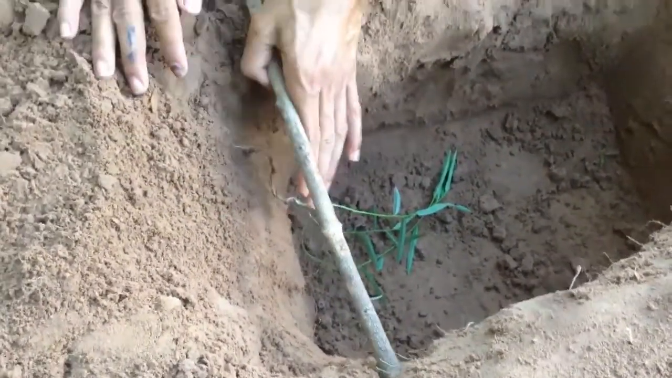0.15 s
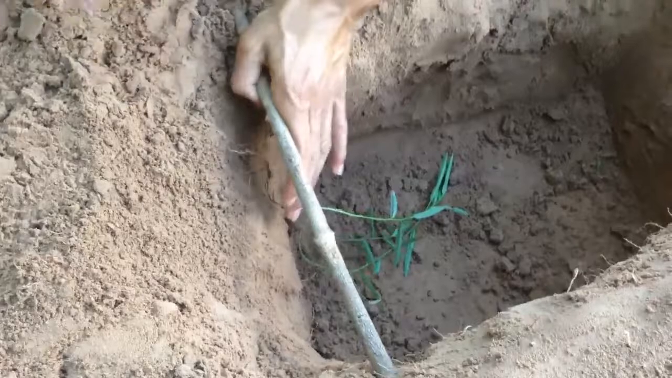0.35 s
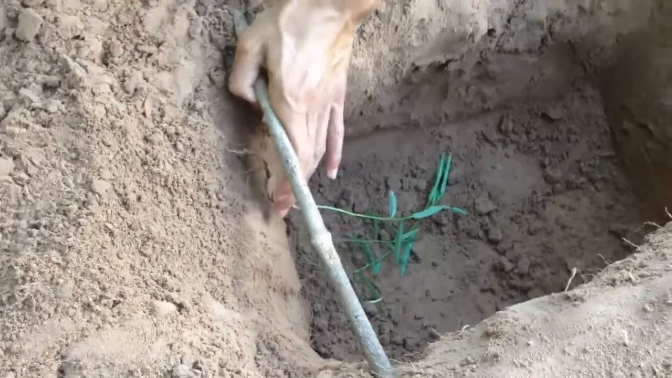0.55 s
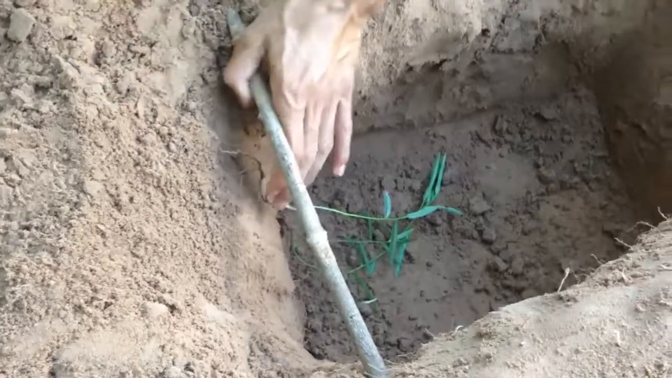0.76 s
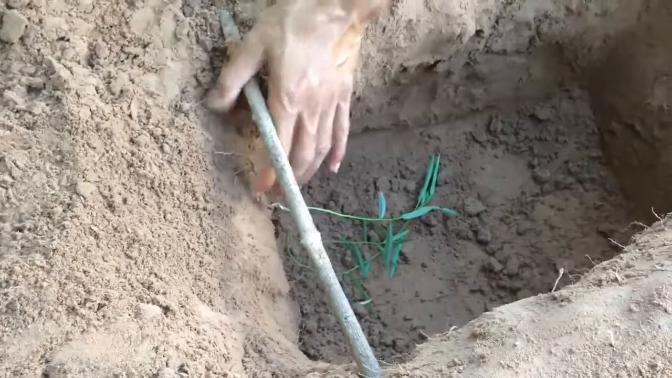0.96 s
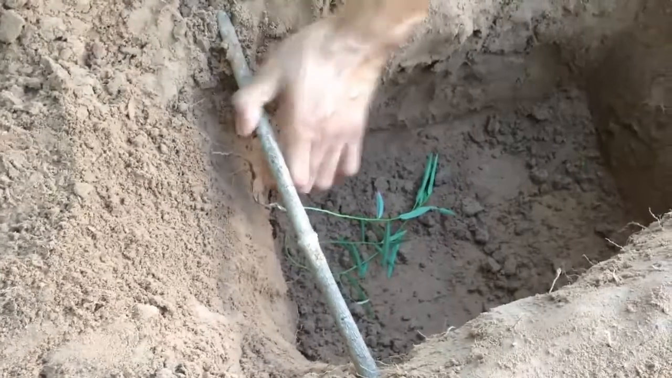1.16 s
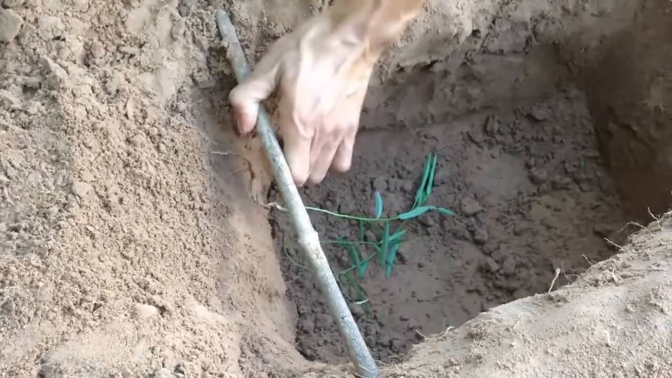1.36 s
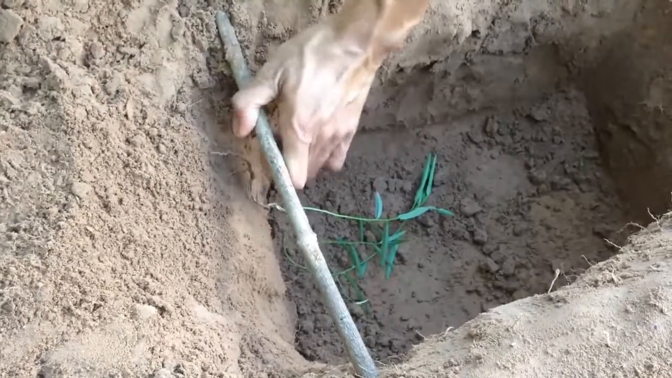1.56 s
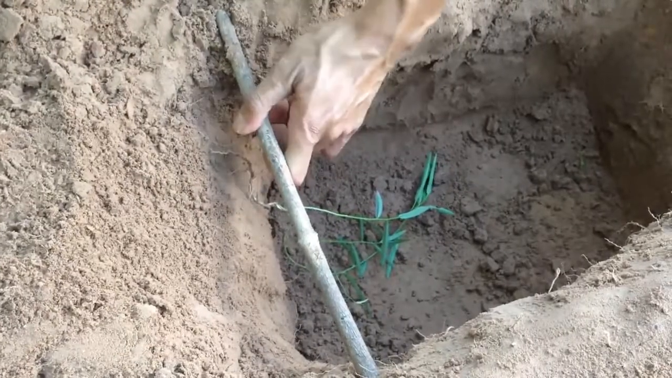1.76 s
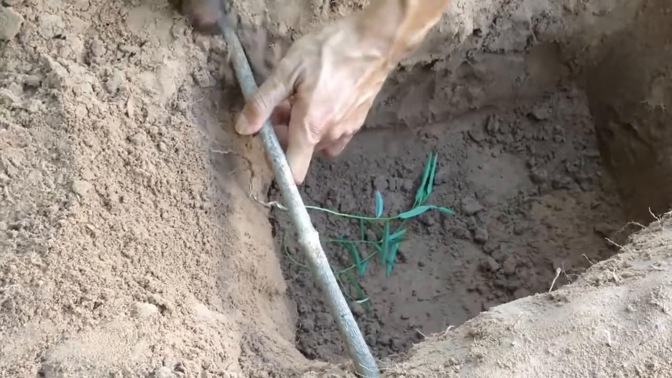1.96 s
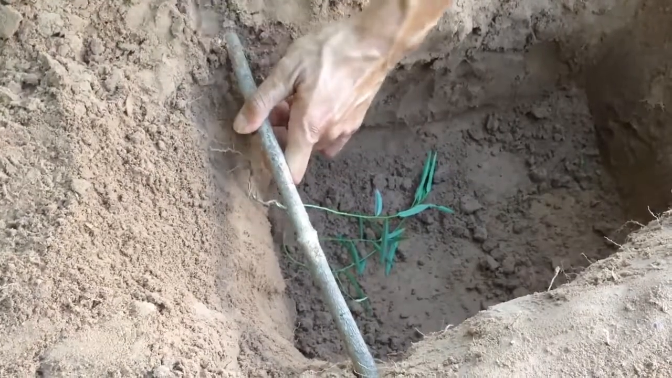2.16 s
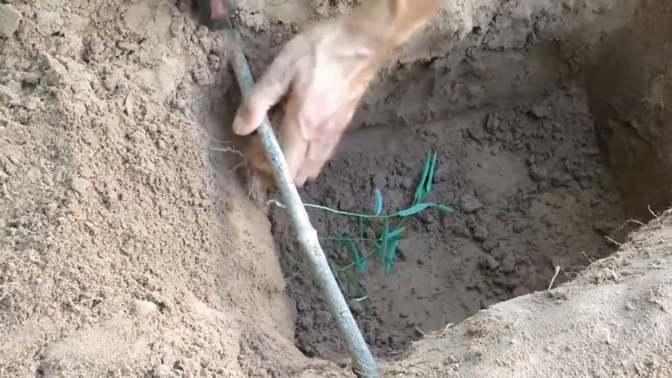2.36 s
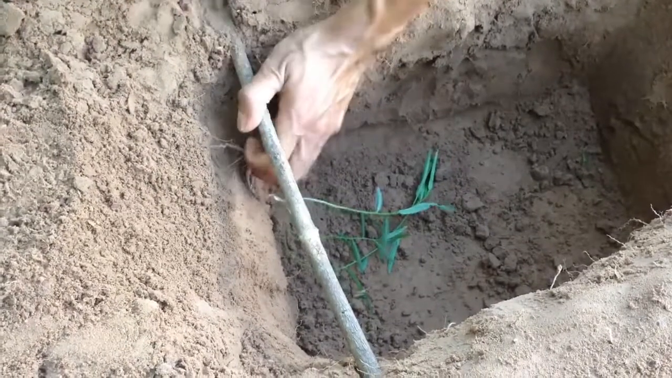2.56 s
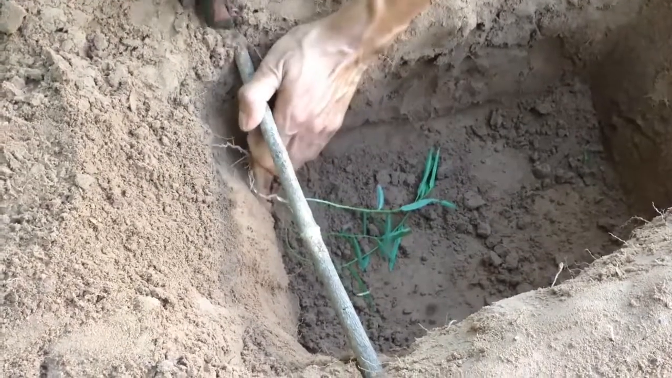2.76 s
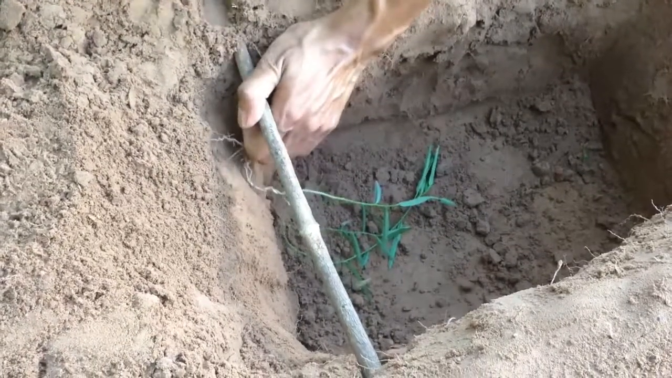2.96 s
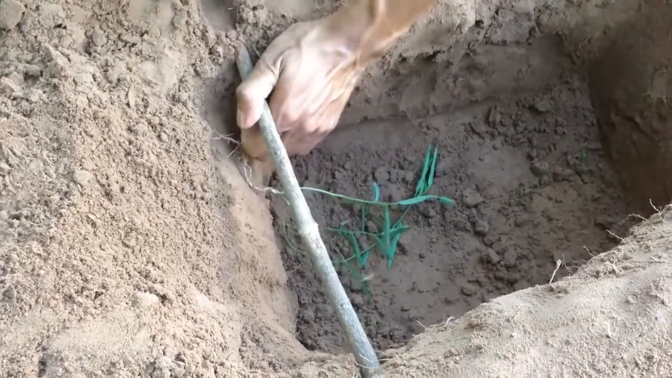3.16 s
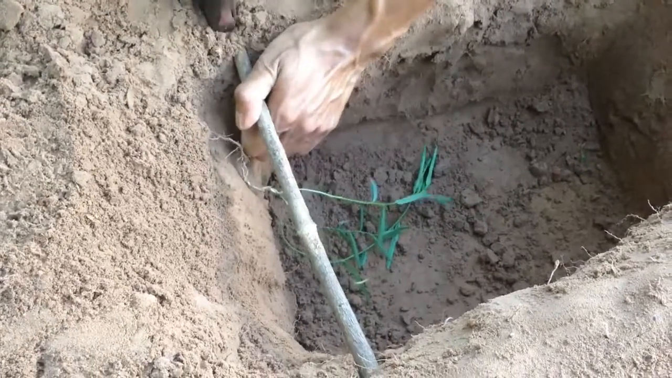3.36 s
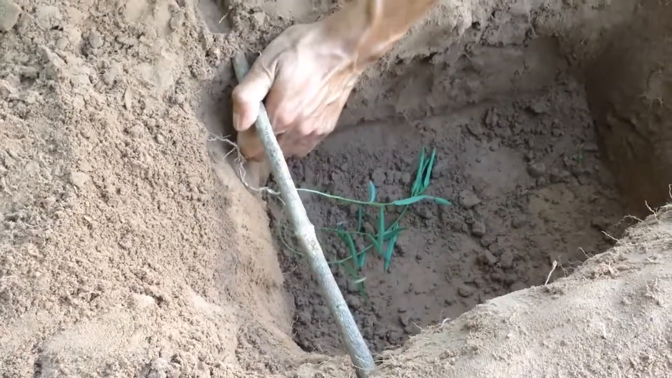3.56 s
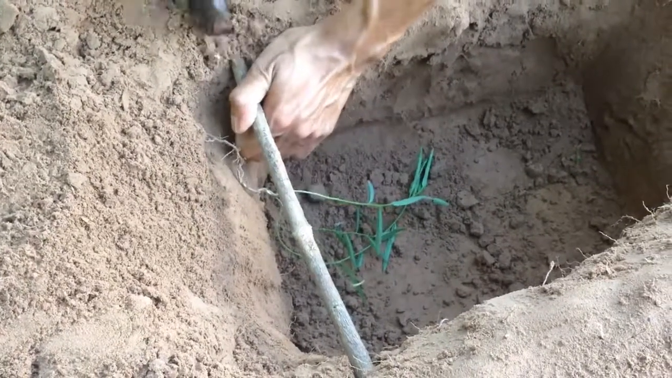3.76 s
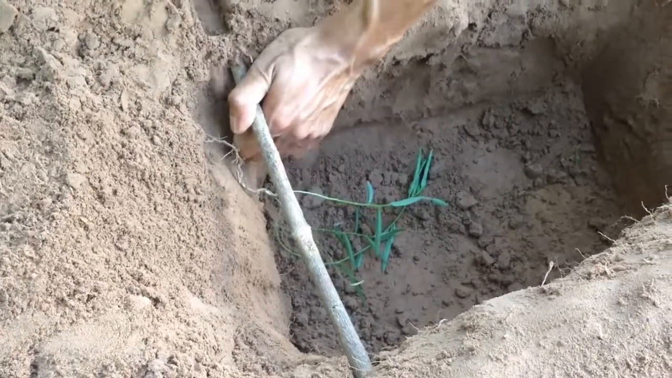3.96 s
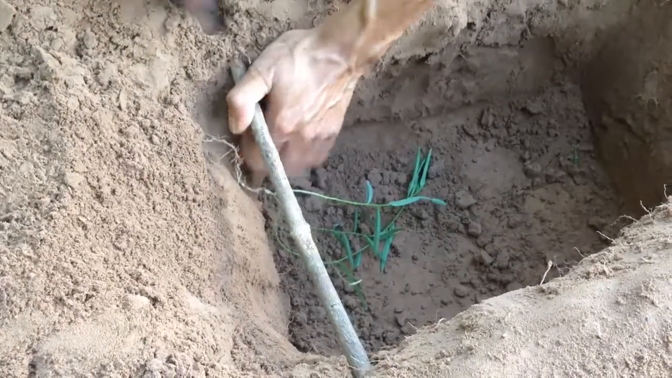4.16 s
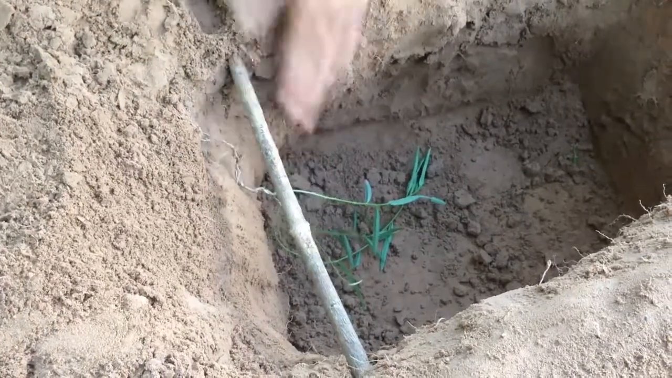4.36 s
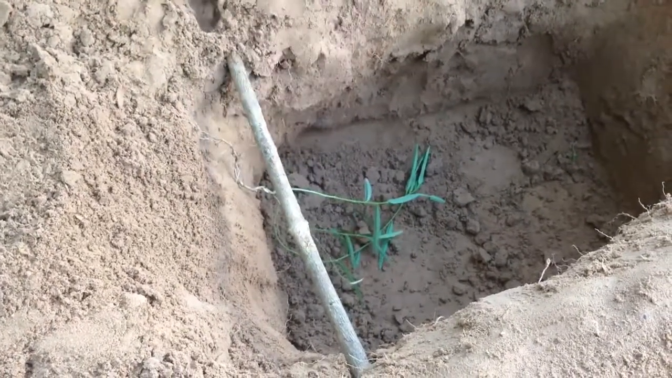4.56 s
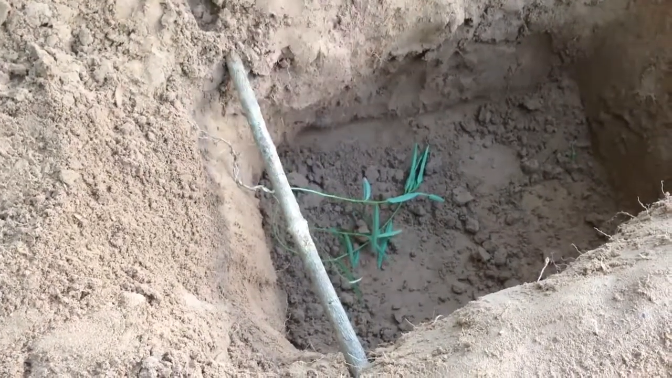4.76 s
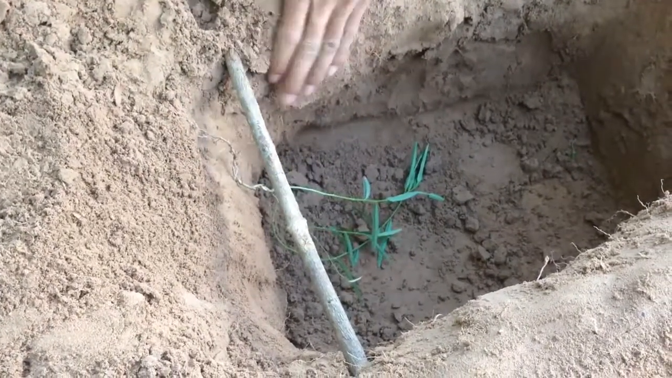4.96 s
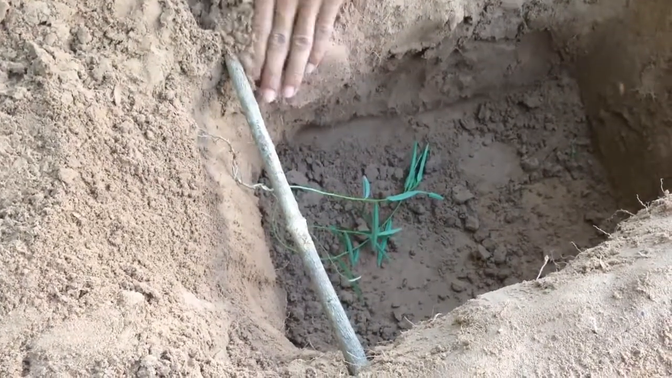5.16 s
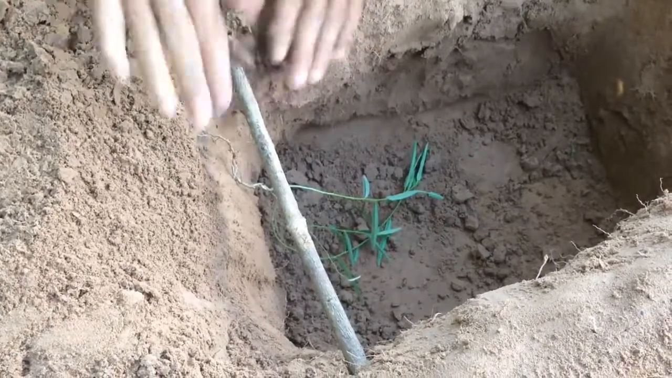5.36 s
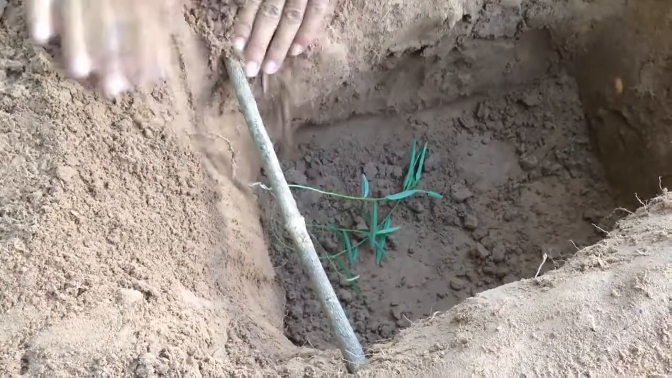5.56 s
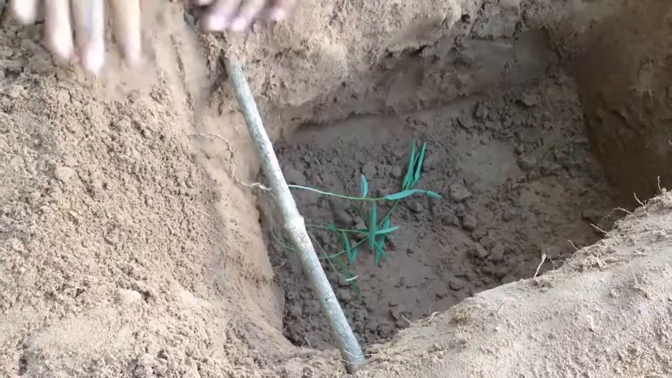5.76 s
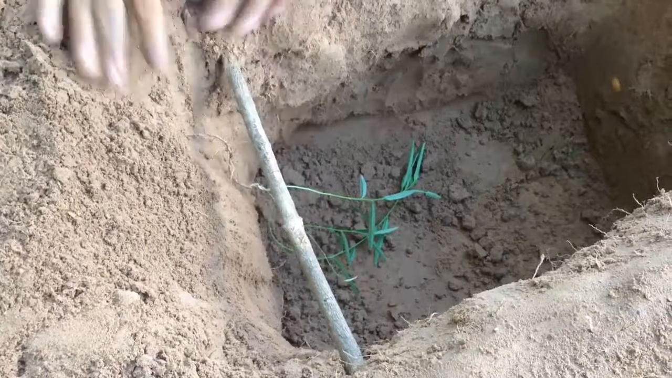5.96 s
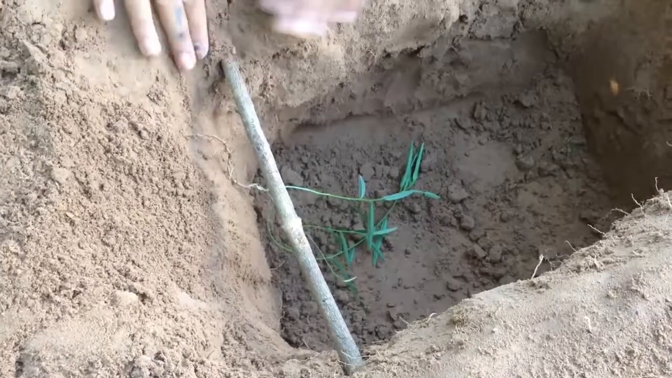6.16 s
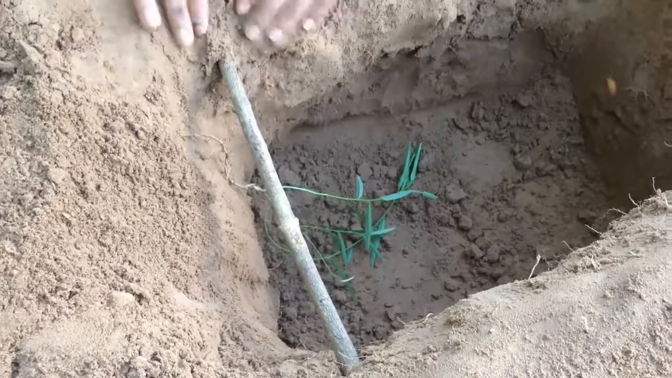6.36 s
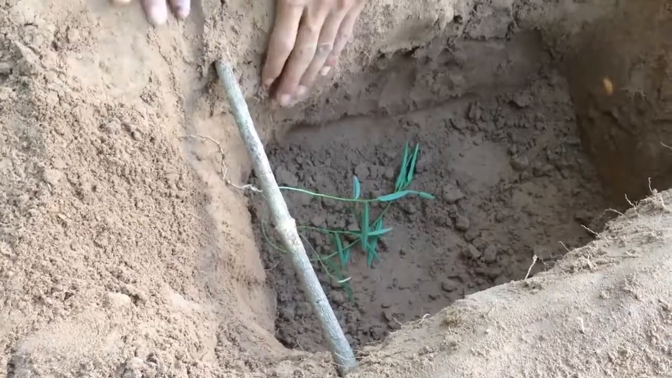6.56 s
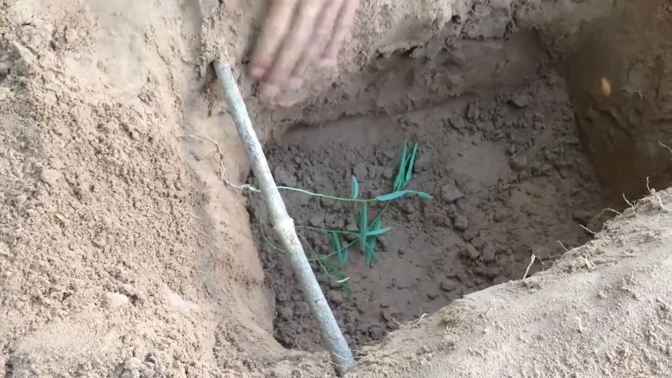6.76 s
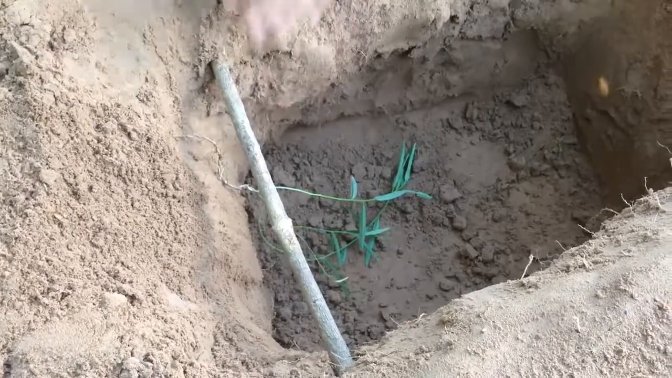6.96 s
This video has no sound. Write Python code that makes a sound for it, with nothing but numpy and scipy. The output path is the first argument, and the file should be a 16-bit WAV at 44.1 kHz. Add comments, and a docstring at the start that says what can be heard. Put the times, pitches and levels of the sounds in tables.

```python
"""Fingers rub and crumble dry soil over a faint steady hiss, as shaped noise with short bumps and squeaks.
Then a thin pipe is knocked into the hard soil at the rim of a dug pit: seven blows, each a dead thud
under a short clack, built from damped modes of earth and pipe with bursts of crushed grains.
Flat hands then pat the earth down around it: softer, looser earth modes and a faint knock of the buried pipe.
Outdoors and close, with almost no echo; a limiter holds the hardest blows."""
import sys
import numpy as np
from scipy import signal
from scipy.fft import rfft, irfft, next_fast_len
from scipy.io import wavfile
from scipy.ndimage import uniform_filter1d, minimum_filter1d

SR = 44100
rng = np.random.default_rng(int(sys.argv[2]) if len(sys.argv) > 2 else 0)


def to_wav(s):
    """Save 16-bit WAV."""
    ch = np.atleast_2d(s).T  # columns
    pcm = np.round(np.clip(ch, -1, 1) * 32767)  # PCM
    wavfile.write(sys.argv[1], SR, pcm.astype(np.int16))


N = 308700  # samples in the scene
T = np.arange(SR // 5) / SR  # time since a contact [s]

# Blows on the pipe: (time [s], thud level [dB], upper thud mode [Hz], knock level [dB], clack level [dB],
# clack tilt [dB/octave], tone with a node at the struck spot [Hz])
BLOWS = [(2.229, -15, 217, -24.5, -30.5, -19, 1210), (2.624, -5.5, 222.7, -21.5, -19.5, 5.5, 1294),
         (3.009, -2.5, 237, -13, -19.5, -0.5, 1550), (3.3075, -2.5, 242.7, -18.5, -27, -4, 951),
         (3.6035, -2, 247.5, -14.5, -24, 1, 3490), (3.963, -1.5, 240.3, -15, -18, -5.5, 1148),
         (4.3118, -1.5, 240, -18, -23, -1.5, 1290)]
# Pats of the hand: (time [s], thud level [dB], thud pitch [Hz], knock level [dB], knock tilt [dB/octave],
# clack level [dB], fingertip level [dB])
PATS = [(5.180, -32, 196, -57, 17, -70, -67.5), (5.688, -19.5, 196, -28, -18, -36, -39.5),
        (5.912, -33.5, 158, -55.5, -5, -56.5, -50.5), (6.153, -25, 153.4, -45, 4, -50, -43),
        (6.402, -19, 151, -35.5, 1, -34.5, -37), (6.625, -27.5, 223, -44.5, -4, -39, -42),
        (6.824, -26, 205, -36.5, 6, -58, -45)]
# Fingers bumping clods: (time [s], bump level [dB], crumble level [dB], bump pitch [Hz])
TOUCHES = [(0.149, -43.5, -56, 255), (0.368, -57, -62, 323), (0.438, -39.5, -48.5, 280),
           (0.519, -48, -52.5, 255), (0.549, -42.5, -50, 215), (0.566, -55, -47.5, 228),
           (1.386, -44, -76, 228), (1.989, -61, -82, 318), (3.247, -46, -69, 187), (5.793, -49, -74, 220),
           (6.066, -46.5, -76, 313)]
# Strokes of skin sliding on dry soil: (start time [s], length [s], level [dB])
RUBS = [(.51, .13, -60), (.79, 0.16, -62.5), (.93, 0.67, -64), (1.45, 0.1, -57), (1.64, 0.41, -67.5),
        (1.80, .05, -47), (4.54, .42, -65), (4.85, 0.12, -57.5), (5.19, 0.26, -58.5)]
# Fingers pressing soil against the pipe: (start time [s], length [s], level [dB])
PRESSES = [(.105, 0.13, -62.5), (.335, 0.057, -58), (.415, 0.081, -51.5), (.51, 0.089, -49),
           (.59, 0.153, -66), (.95, 0.085, -57), (1.21, .08, -55.5)]
# Skin squeaking on the pipe: (centre time [s], pitch [Hz], peak level [dB], length [s])
SQUEAKS = [(.865, 3990, -54, 0.04), (.888, 2429, -52, 0.029)]

# Modes of the ground, before each contact shifts them: (frequency [Hz], level [dB], t60 [s])
PACKED_EARTH = [(170, -4.3, .046), (242, 0, .036)]
LOOSE_EARTH = [(103.6, -3.5, 0.038), (183.8, 4, 0.042), (242, -9, 0.036), (334.5, -3, 0.024)]
# Hollow tone over the thud, before each contact shifts it: (frequency [Hz], level [dB], t60 [s])
HOLLOW = [(425, -2.5, 0.037), (480, 0.5, 0.047)]
# Lower and upper modes of the struck pipe: (frequency [Hz], level [dB], t60 [s])
PIPE_KNOCK = [(678, -3.5, .024), (847, 2, 0.03), (1154, 3, .018), (1372, -1, .018)]
PIPE_CLACK = [(2040, -2, 0.015), (2426, -3.5, 0.015), (3357, -2.5, .013), (3686, -3.5, .013),
              (4360, -5, 0.01), (5135, -11.5, .011)]
# Lower and upper modes of the pipe end packed in loose earth: (frequency [Hz], level [dB], t60 [s])
BURIED_KNOCK = [(781, -6.5, 0.021), (846, -1, 0.014), (1030, -6, 0.015), (1222, -16.5, 0.039)]
BURIED_CLACK = [(1680, -1, 0.0061), (2126, -7.5, 0.024), (2460, -1, 0.0078), (3340, -1.5, 0.013),
                (4270, -3, 0.0067)]

# Noise colours of loose grains, crushed soil and crumbling clods: (frequency [Hz], density [dB per Hz])
GRIT = [(3000, -18.5), (5500, 0.5), (7500, -4.5), (9500, -8), (11500, -4.5), (15000, -10)]
CRUNCH = [(150, -10), (350, 5.5), (700, -6), (1250, -2.5), (1700, -8), (2300, -7.5), (3500, -10),
          (5500, -25.5), (12000, -40)]
CRUMBLE = [(200, -26), (600, 2), (1100, -1.5), (1700, -16), (3500, -16), (8000, -27), (15000, -35)]
# Noise colours of a dull bump, a scuff through soil and rubbing skin: (frequency [Hz], density [dB per Hz])
BUMP = [(30, -28), (120, -6), (220, 4), (300, 2), (450, -13.5), (800, -24.5), (2000, -61)]
SCUFF = [(30, -2.5), (70, -2), (200, 2.5), (450, -0.5), (600, -5.5), (850, -7), (1100, -12.5), (1800, -21),
         (3500, -25.5), (9000, -36.5)]
RUB = [(200, -12.5), (800, -1), (1600, -5.5), (2600, 2), (4200, 4.5), (7000, -5), (11000, 1.5), (15000, -8)]
# Noise colours of microphone hiss and outdoor air: (frequency [Hz], density [dB per Hz])
HISS = [(880, -37), (1500, -12.5), (1770, -5.5), (2170, 0), (2520, -5), (3000, -0.5), (3340, -5.5),
        (4100, -4.5), (4440, -1.5), (4940, -5.5), (6010, -7.5), (7600, -6), (12300, -1), (14600, -10),
        (15500, -14)]
AIR = [(15, -40), (25, -8.5), (76, -1), (244, 1), (312, -1.5), (507, -3.5), (659, -6.5), (855, -6.5),
       (1600, -12.5), (2080, -44.5), (3520, -120)]
# Decay of the faint tail from pit walls and ground: (frequency [Hz], t60 [s])
SURROUNDS = [(100, .14), (300, .13), (1000, .12), (3000, .1), (12000, .06)]

PACKED_HZ, LOOSE_HZ = 242, 175  # thud pitch at which each earth's modes stand as listed
BUMP_HZ = 260  # bump pitch at which the bump colour stands as listed
RAMMED_DB_PER_OCTAVE = 21.5  # gain of the ringing as ramming raises the thud pitch
BLOW_HOLLOW_DB, PUSH_DB, SETTLE_DB = -20, -23, -39.5  # relative to the thud
GROUND_LAG_S = .001  # the ground gives way just after the contact
CRUNCH_DB = -12.5  # relative to the knock
FIRST_GRIT_DB, GRIT_LOSS_DB = -24.5, 3.5  # relative to the thud; each blow leaves fewer loose grains
NODE_DB, NODE_OCTAVES = -10, 0.22  # depth and width of the gap the struck spot leaves among the pipe tones
PAT_HOLLOW_DB, HOLLOW_FOLLOWS = 2, 0.76  # hollow tone follows the clack by this share, the thud by the rest
PAT_GRIT_DB = -15  # relative to the clack
STROKE_ATTACK_S, STROKE_RELEASE_S = 0.037, 0.039
ECHO_DB = -29.5  # relative to the contacts
HISS_DB, AIR_DB = -60, -66  # rms
CEILING_DB, RECOVERY_DB_PER_S, LOOK_AHEAD_S = -0.37, 7.5, .006  # limiter
TOP_HZ = 15500  # band limit


def blows():
    """Each blow bites through loose grains, clacks on the soil-damped pipe and sets the packed ground thudding."""
    out = np.zeros(N)
    for earlier, (s, thud_db, thud_hz, knock_db, clack_db, clack_tilt_db, node_hz) in enumerate(BLOWS):
        # the upper mode and the hollow tone rise and grow as the soil is rammed
        stiffening = thud_hz / PACKED_HZ
        rammed_db = RAMMED_DB_PER_OCTAVE * np.log2(stiffening)
        # only the upper mode shifts; it lies half an octave up, so the tilt is doubled
        mode_shifts = np.array([[1], [stiffening]])
        thud = amp(thud_db) * ring(PACKED_EARTH, attack=.006, stretch=mode_shifts, tilt_db=2 * rammed_db)
        hollow_db = thud_db + BLOW_HOLLOW_DB + rammed_db
        hollow = amp(hollow_db) * ring(HOLLOW, attack=0.0011, stretch=stiffening)

        knock = amp(knock_db) * ring(struck_at(PIPE_KNOCK, node_hz), attack=0.00027)
        clack_modes = struck_at(PIPE_CLACK, node_hz)
        clack = amp(clack_db) * ring(clack_modes, attack=0.00035, tilt_db=clack_tilt_db)
        pipe = grind(knock + clack, share=0.15, t60=0.011)

        grit_db = thud_db + FIRST_GRIT_DB - GRIT_LOSS_DB * earlier
        grit = amp(grit_db) * puff(GRIT, t60=0.01, attack=0.00026)
        crunch = amp(knock_db + CRUNCH_DB) * puff(CRUNCH, t60=.045, attack=0.0094)
        push = amp(thud_db + PUSH_DB) * puff(SCUFF, t60=.04, attack=.004)  # soil shoved aside
        # the ground trembles a moment longer
        settle = amp(thud_db + SETTLE_DB) * puff(BUMP, t60=.3, attack=.01)

        add(out, s - .004, crunch + push)
        add(out, s, hollow)
        add(out, s + GROUND_LAG_S, thud + settle)
        add(out, s + 0.00047, pipe + grit)
    return out


def pats():
    """The fingers land just before the palm; looser earth gives a deeper thud that jogs the buried pipe end."""
    out = np.zeros(N)
    for s, thud_db, thud_hz, knock_db, knock_tilt_db, clack_db, fingertips_db in PATS:
        thud = amp(thud_db) * ring(LOOSE_EARTH, attack=0.0051, stretch=thud_hz / LOOSE_HZ)
        hollow_db = thud_db + HOLLOW_FOLLOWS * (clack_db - thud_db) + PAT_HOLLOW_DB
        hollow = amp(hollow_db) * ring(HOLLOW, attack=0.001, stretch=0.953)
        knock = amp(knock_db) * ring(BURIED_KNOCK, attack=0.00011, tilt_db=knock_tilt_db)
        clack = amp(clack_db) * ring(BURIED_CLACK, attack=0.00033, tilt_db=1.0)
        pipe = grind(knock + clack, share=0.57, t60=0.0093)
        grit = amp(clack_db + PAT_GRIT_DB) * puff(GRIT, t60=0.019, attack=0.00086)
        fingertips = amp(fingertips_db) * puff(SCUFF, t60=0.063, attack=0.0034)
        add(out, s - .007, fingertips)
        add(out, s, thud + hollow + pipe + grit)
    return out


def fingers():
    """Fingers press and rub the soil, bump and crumble small clods, and squeak on the pipe."""
    return sliding(RUBS, RUB, grain_db=2.2) + sliding(PRESSES, SCUFF, grain_db=2.6) + touches() + squeaks()


def sliding(strokes, spectrum, grain_db):
    """Each stroke swells, holds and lets go; dry grains of uneven size catch under the skin."""
    t = np.arange(N) / SR
    pressure = np.zeros(N)
    for s, length, db in strokes:
        swell = (t - s) / STROKE_ATTACK_S
        release = (s + length - t) / STROKE_RELEASE_S
        shape = np.clip(np.minimum(swell, release), 0, 1)
        pressure = np.maximum(pressure, amp(db) * shape)
    grains = rng.standard_normal(N) * amp(grain_db * rng.exponential(size=N))
    return pressure * unit(colour(grains, spectrum))


def touches():
    """A finger bumps a clod with a dull puff while its grains crumble; smaller clods sound higher."""
    out = np.zeros(N)
    for s, bump_db, crumble_db, bump_hz in TOUCHES:
        clod = [(hz * bump_hz / BUMP_HZ, db) for hz, db in BUMP]
        bump = amp(bump_db) * puff(clod, t60=0.023, attack=.002)
        crumble = amp(crumble_db) * puff(CRUMBLE, t60=0.031, attack=0.00061)
        add(out, s, bump + crumble)
    return out


def squeaks():
    """Skin squeaks on the pipe: a short swelling tone, roughened by pitch jitter on every sample."""
    out = np.zeros(N)
    for s, hz, db, length in SQUEAKS:
        jittered_hz = hz * (1 + 0.3 * rng.standard_normal(len(T)))
        phase = 2 * np.pi * np.cumsum(jittered_hz) / SR
        swell = np.sin(np.pi * np.minimum(T / length, 1))
        add(out, s - length / 2, amp(db) * swell * np.sin(phase))
    return out


def ring(modes, attack, stretch=1, tilt_db=0):
    """Damped modes of alternating sign; each contact spot tilts their strengths and varies them by about 1 dB."""
    hz, db, t60 = np.transpose(modes)[:, :, None]
    db = db + tilt_db * np.log2(hz / hz[0]) + rng.standard_normal(hz.shape)
    sign = (-1) ** np.arange(len(modes))[:, None]
    waves = sign * amp(db - 60 * T / t60) * np.sin(2 * np.pi * hz * stretch * T)
    return burst(waves.sum(0) * (1 - np.exp(-T / attack)))


def struck_at(modes, node_hz):
    """Tones near node_hz hardly move at the struck spot and stay weak."""
    struck = []
    for hz, db, t60 in modes:
        octaves_away = np.log2(hz / node_hz)
        gap_db = NODE_DB * np.exp(-(octaves_away / NODE_OCTAVES) ** 2)
        struck.append((hz, db + gap_db, t60))
    return struck


def grind(x, share, t60):
    """Grains break one after another under a contact, and each rings the body again."""
    force = rng.standard_normal(len(T)) * amp(-60 * T / t60) * T
    force *= share / np.linalg.norm(force)
    force[0] = 1  # the first hit
    return signal.fftconvolve(x, force / np.linalg.norm(force))[:len(T)]


def puff(spectrum, t60, attack):
    """A short burst of crushed soil grains: decaying noise with a soft onset, then coloured."""
    envelope = amp(-60 * T / t60) * (1 - np.exp(-T / attack))
    return burst(colour(rng.standard_normal(len(T)) * envelope, spectrum))


def surrounds(x):
    """The pit walls and the ground scatter a short faint tail, new for every half second."""
    out = np.zeros(N)
    for start in range(0, N, SR // 2):
        # noise that dies away at its own rate in each frequency band
        hz, t, z = signal.stft(rng.standard_normal(SR // 3), SR, nperseg=256)
        decay = amp(-60 * t / along(SURROUNDS, hz)[:, None])
        tail = signal.istft(z * decay, SR, nperseg=256)[1]
        add(out, start / SR, signal.fftconvolve(x[start:start + SR // 2], tail / np.linalg.norm(tail)))
    return out


def background():
    """Faint steady microphone hiss and low outdoor air, both coloured noise."""
    hiss = amp(HISS_DB) * unit(colour(rng.standard_normal(N), HISS))
    air = amp(AIR_DB) * unit(colour(rng.standard_normal(N), AIR))
    return hiss + air


def limiter(x):
    """The gain drops just before a peak passes the ceiling and creeps back, so the hiss dips after hard blows."""
    ahead = round(LOOK_AHEAD_S * SR)
    needed_db = np.minimum(0, CEILING_DB - 20 * np.log10(np.abs(x) + 1e-9))
    early_db = minimum_filter1d(needed_db, 2 * ahead)
    # a running minimum against a steady climb gives the slow recovery
    climb_db = RECOVERY_DB_PER_S * np.arange(N) / SR
    gain_db = climb_db + np.minimum.accumulate(early_db - climb_db, axis=-1)
    return x * amp(uniform_filter1d(gain_db, ahead))


def amp(db):
    """Decibels to gain."""
    return 10 ** (np.asarray(db) / 20)


def unit(x):
    """Scale to rms 1."""
    return x / np.sqrt(np.mean(x ** 2) + 1e-20)


def burst(x):
    """Scale a short sound to the energy of 10 ms at rms 1."""
    return x / np.sqrt(np.sum(x ** 2) / (SR / 10 ** 2) + 1e-20)


def along(points, hz):
    """(frequency [Hz], value) points read on a log frequency axis."""
    f, v = np.transpose(points)
    return np.interp(np.log(hz + 1), np.log(f + 1), v)


def colour(x, spectrum):
    """Causal minimum-phase filter with the gain of (frequency [Hz], level [dB]) points."""
    m = 2 * next_fast_len(len(x))
    gain = amp(along(spectrum, np.fft.rfftfreq(m, 1 / SR)))
    # folding the cepstrum onto positive times makes the filter causal
    cepstrum = irfft(np.log(gain))
    cepstrum[1:m // 2] *= 2
    cepstrum[m // 2 + 1:] = 0
    return irfft(rfft(x, m) * np.exp(rfft(cepstrum)))[:len(x)]


def add(track, s, sound):
    """Mix a sound in at time s [s]."""
    part = track[round(s * SR):][:len(sound)]
    part += sound[:len(part)]


def scene():
    """All contacts, their faint echo and the background."""
    contacts = blows() + pats() + fingers()
    return (contacts + amp(ECHO_DB) * surrounds(contacts) + background())[None]


def record(dry):
    """The hardest blows are limited and round off at full scale; nothing passes above the band limit."""
    held = limiter(dry)
    rounded = held / (1 + np.abs(held) ** 10) ** (1 / 10)
    m = next_fast_len(N + SR // 2)
    in_band = np.fft.rfftfreq(m, 1 / SR) < TOP_HZ
    return irfft(rfft(rounded, m) * in_band, m)[..., :N]


dry = scene()
out = record(dry)
to_wav(out)
```